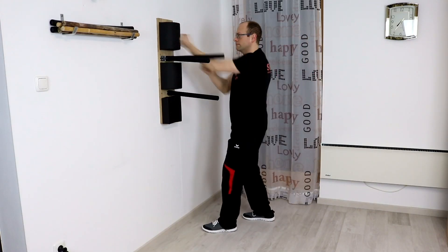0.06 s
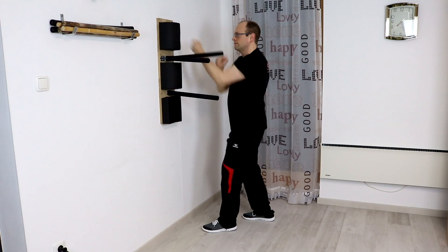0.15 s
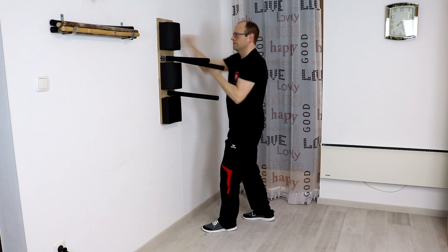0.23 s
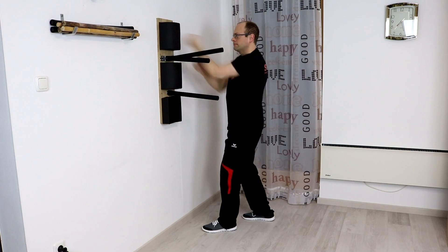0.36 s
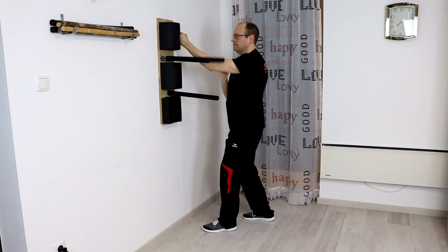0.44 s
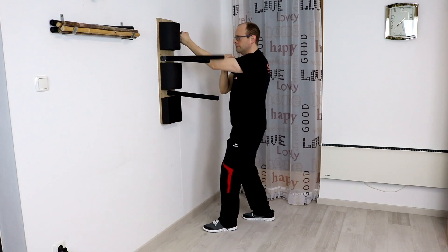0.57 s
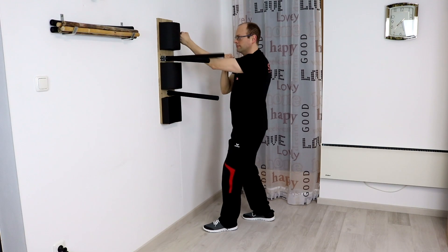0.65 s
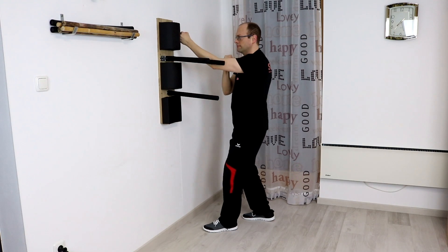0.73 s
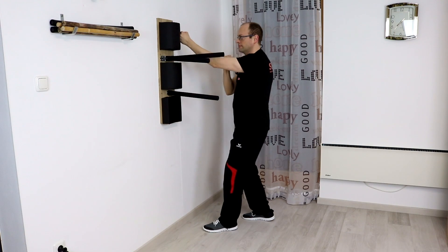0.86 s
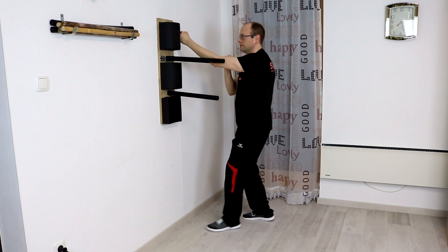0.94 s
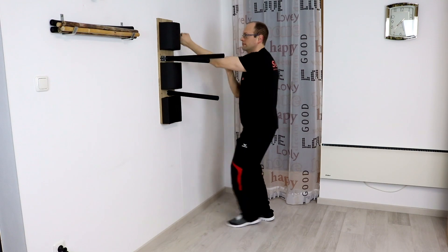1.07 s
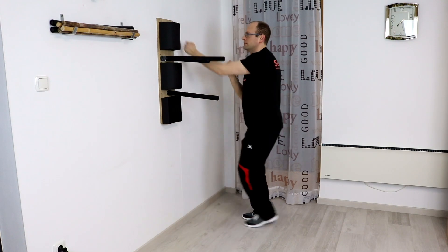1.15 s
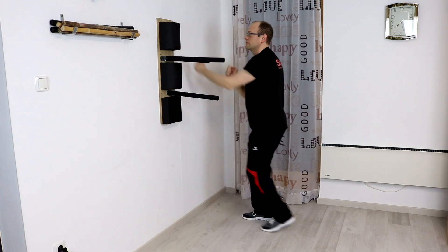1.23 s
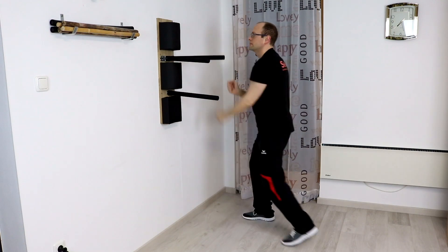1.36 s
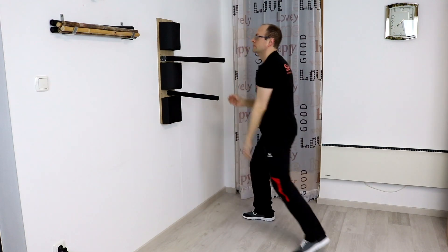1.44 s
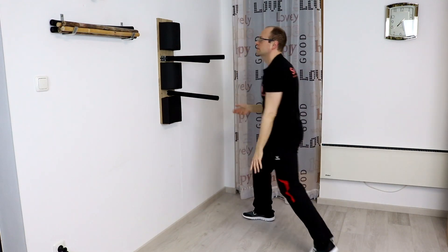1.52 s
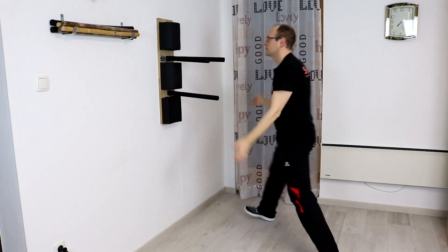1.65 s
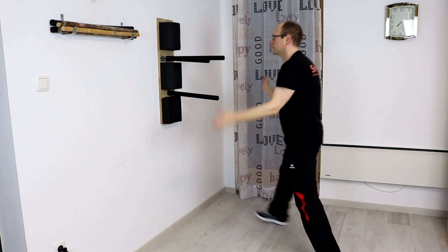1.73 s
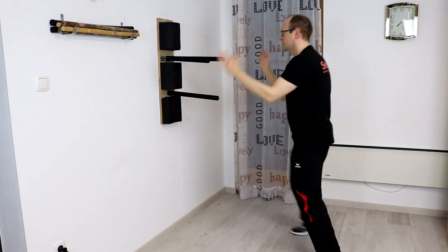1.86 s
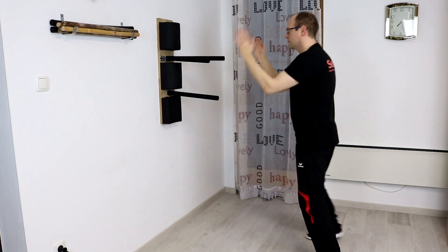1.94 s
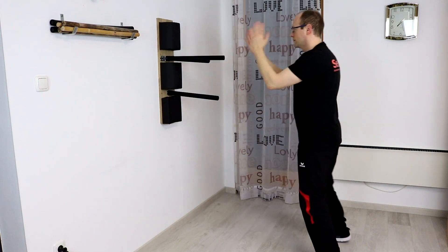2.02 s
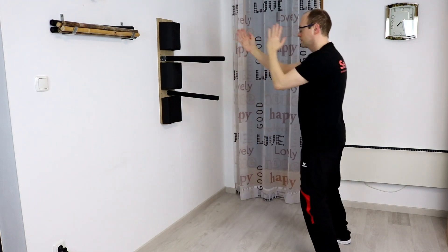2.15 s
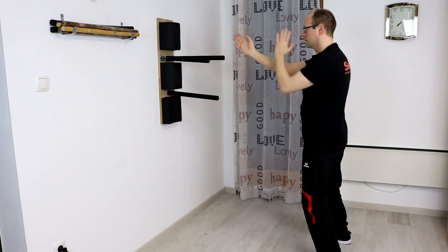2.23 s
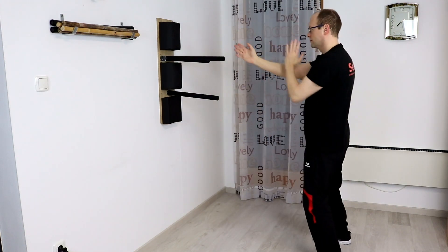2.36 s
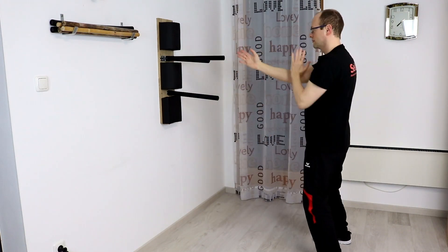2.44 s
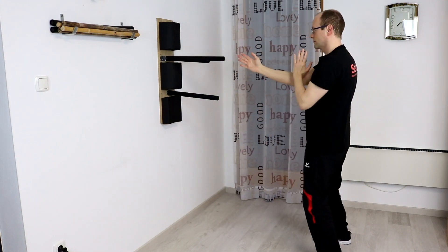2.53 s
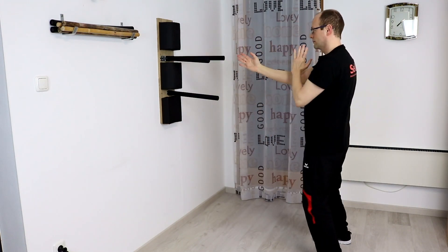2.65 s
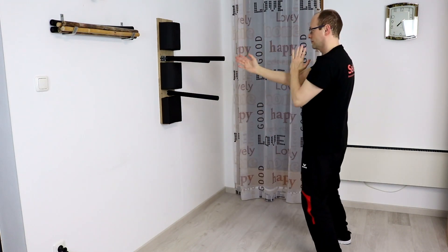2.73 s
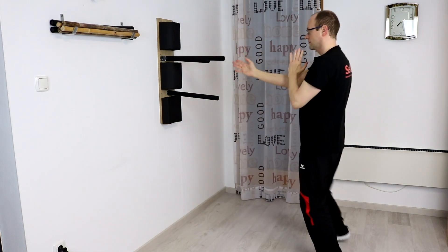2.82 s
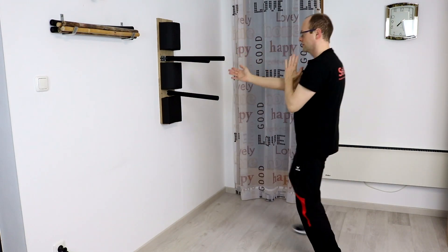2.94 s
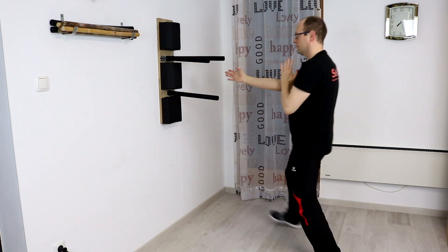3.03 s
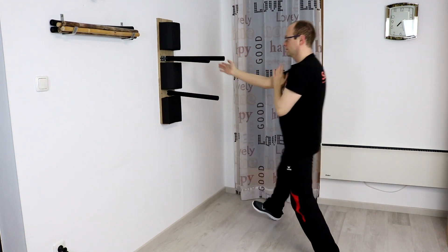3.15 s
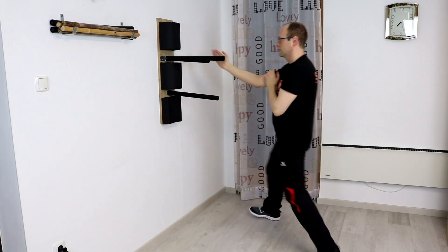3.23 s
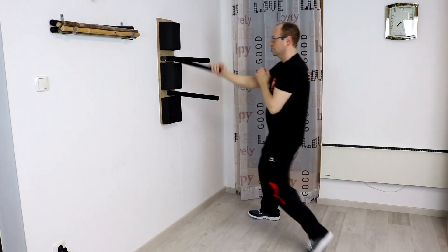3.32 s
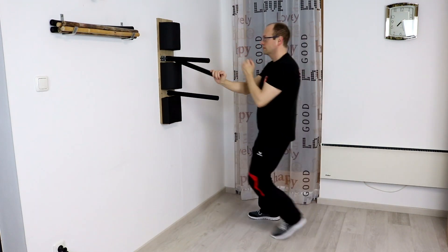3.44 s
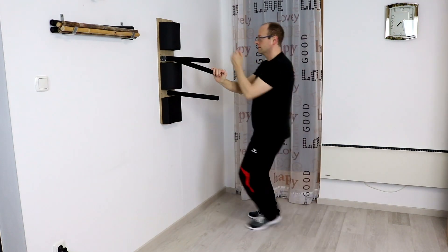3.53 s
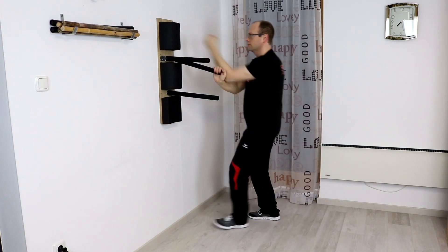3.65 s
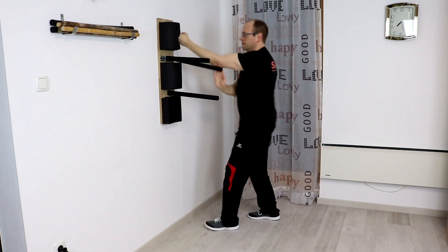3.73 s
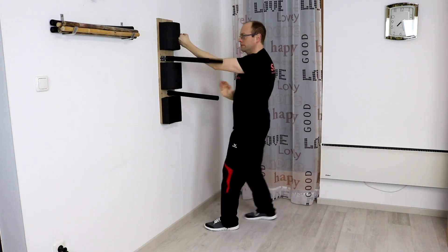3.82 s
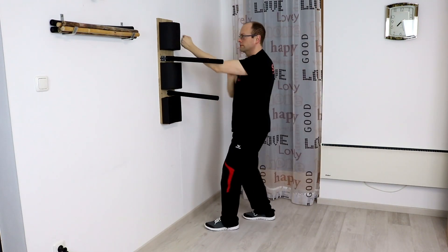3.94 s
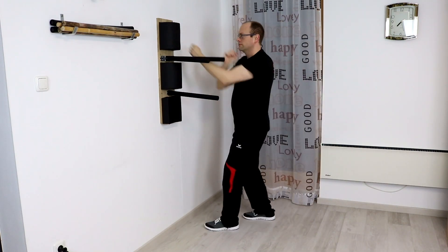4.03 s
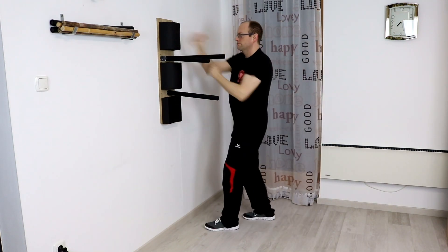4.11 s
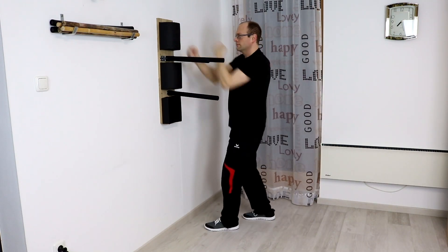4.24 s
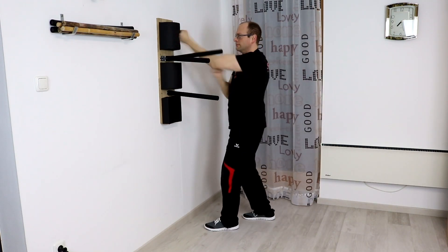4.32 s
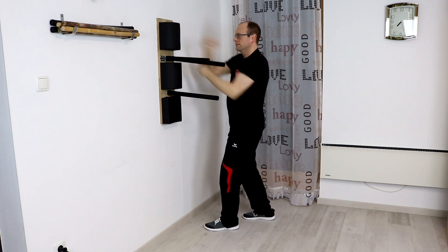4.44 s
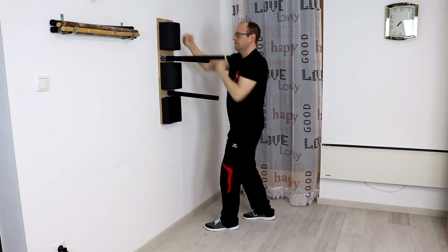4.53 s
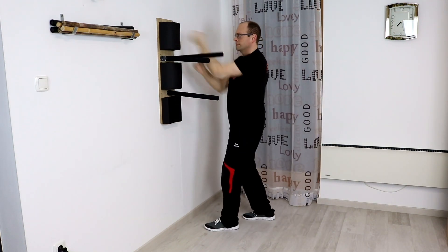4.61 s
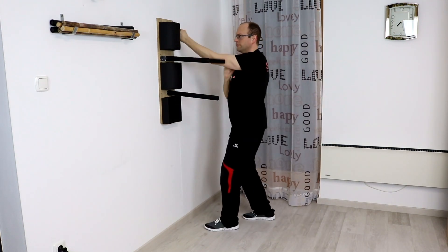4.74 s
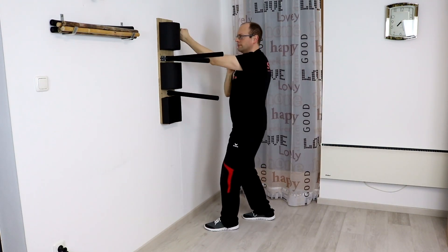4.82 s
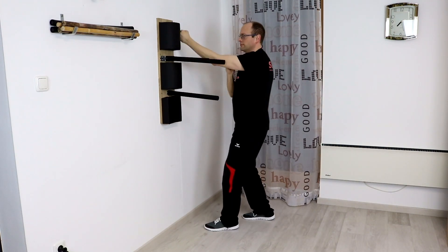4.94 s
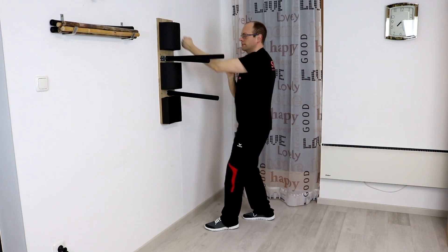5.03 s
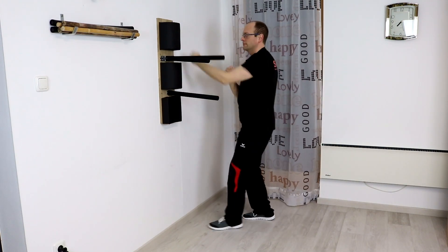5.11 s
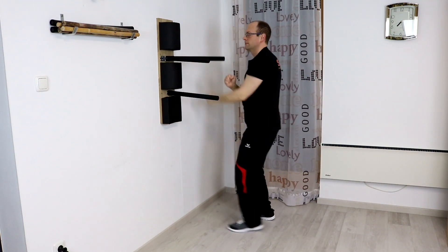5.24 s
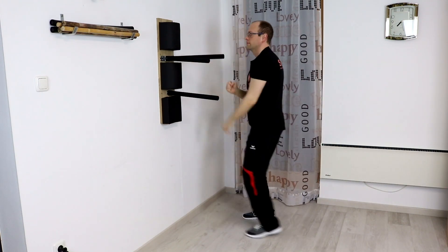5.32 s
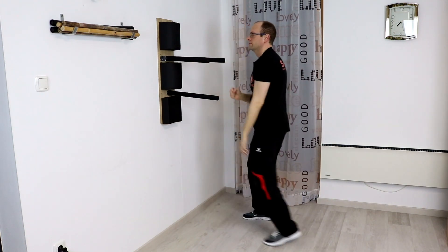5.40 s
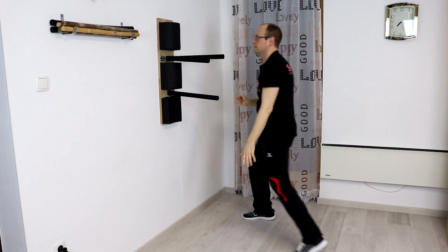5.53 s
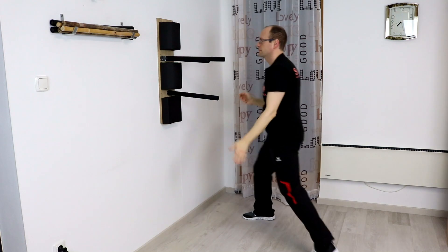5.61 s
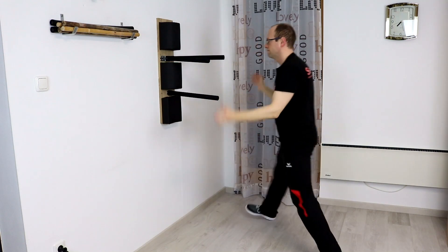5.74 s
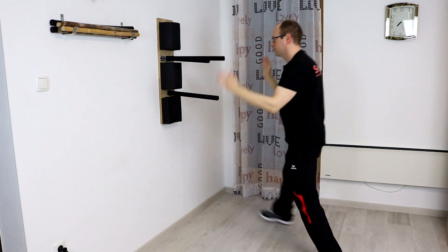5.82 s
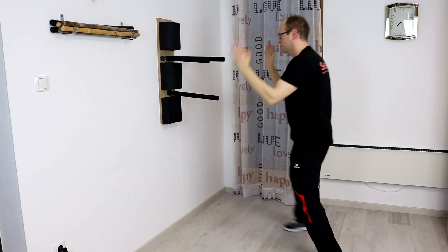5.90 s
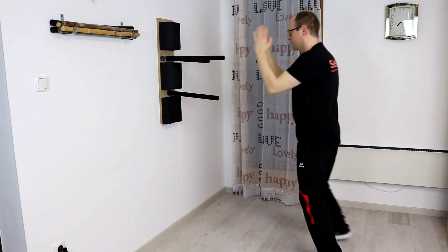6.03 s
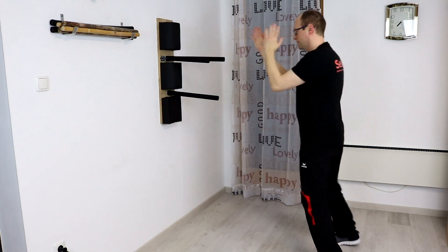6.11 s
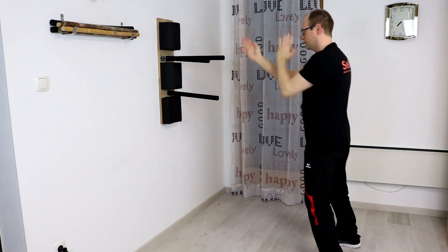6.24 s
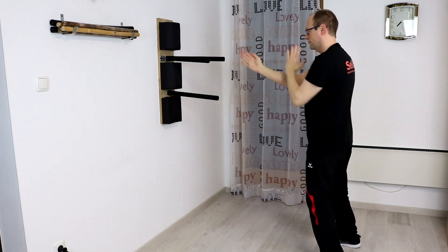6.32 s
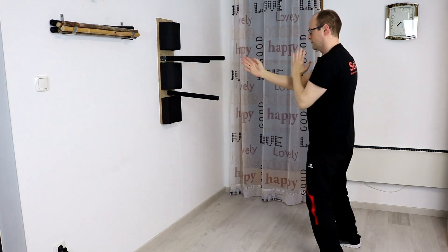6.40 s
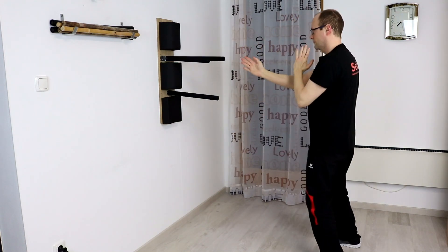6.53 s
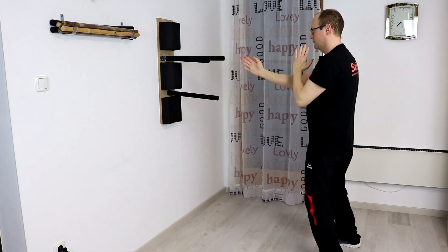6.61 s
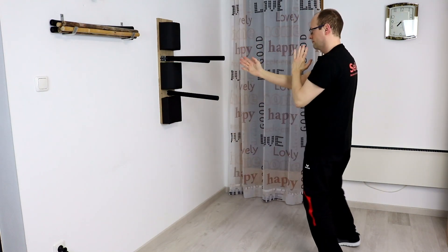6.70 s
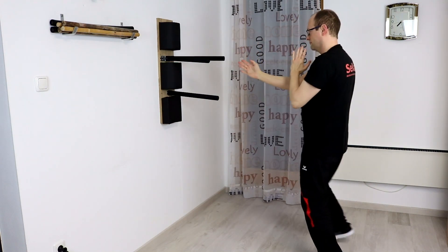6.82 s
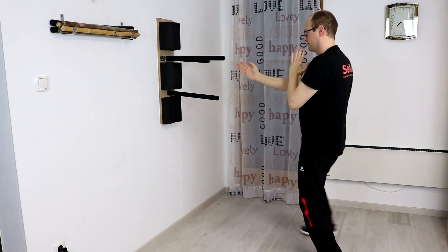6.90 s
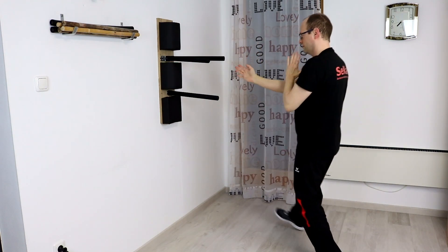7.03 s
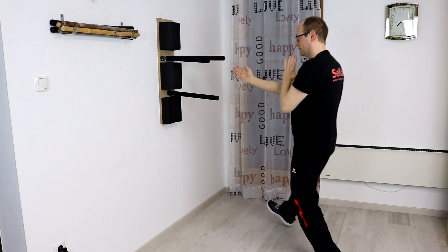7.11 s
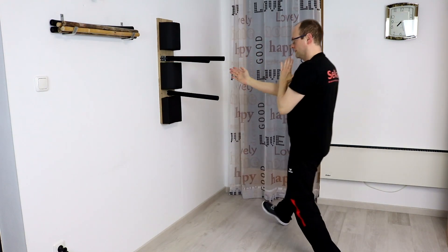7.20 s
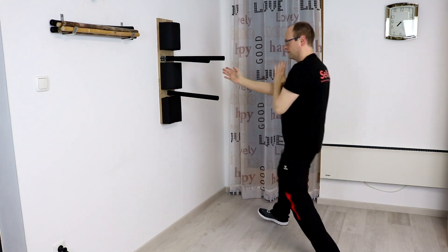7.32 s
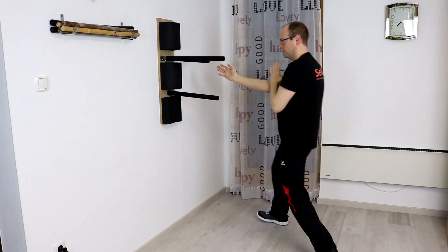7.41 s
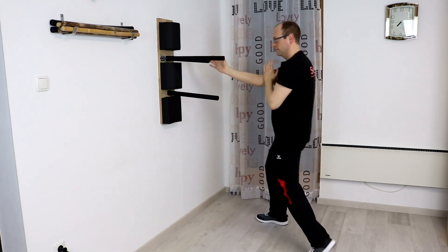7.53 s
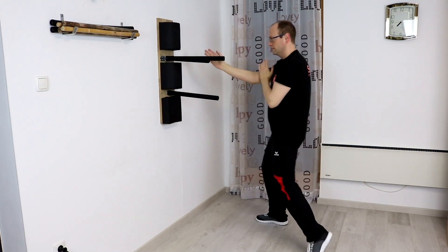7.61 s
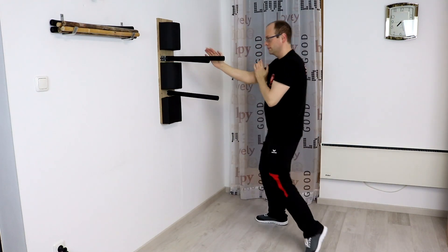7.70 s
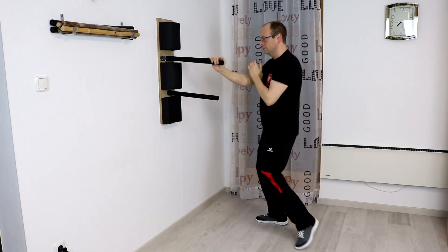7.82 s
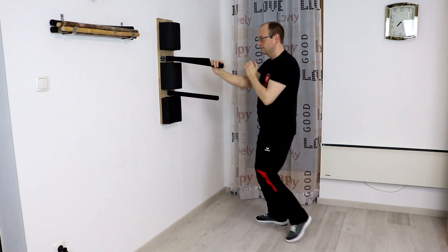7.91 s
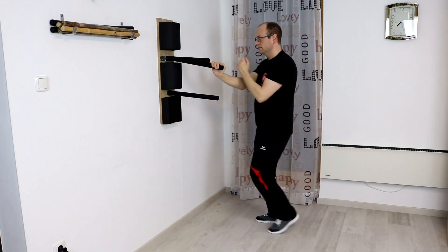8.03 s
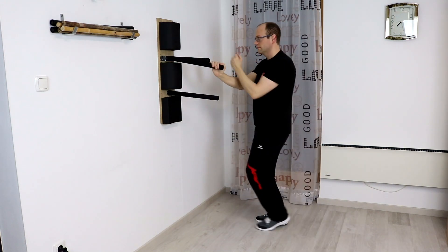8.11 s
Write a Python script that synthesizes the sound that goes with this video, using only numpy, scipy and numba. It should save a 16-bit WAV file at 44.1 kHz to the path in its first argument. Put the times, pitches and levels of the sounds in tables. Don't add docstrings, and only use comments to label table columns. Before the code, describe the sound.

Hard punches on a padded wooden board, sharp skin snaps with dull ringing thumps, separated by dragging soles, knocking steps and light palm slaps indoors.

```python
import sys
import numpy as np
from scipy import signal
from scipy.fft import rfft, irfft, next_fast_len
from scipy.io import wavfile
from scipy.ndimage import uniform_filter1d
from numba import njit

SR = 44100
rng = np.random.default_rng(int(sys.argv[2]) if len(sys.argv) > 2 else 0)


def pcm_store(signal):
    levels = np.round(np.clip(np.atleast_2d(signal), -1, 1) * 32767)
    wavfile.write(sys.argv[1], SR, levels.astype(np.int16).T)


def makeup_ratio(level_db):
    decades = np.asarray(level_db, float) / 20
    return 10 ** decades


N = 359856
LEAD = 4410


def unit(x):
    return x / np.sqrt(np.mean(x ** 2))


def colour(x, points):
    hz, db = np.transpose(points)
    size = next_fast_len(len(x))
    bins = np.maximum(np.arange(size // 2 + 1) * SR / size, 1)
    gain = makeup_ratio(np.interp(np.log(bins), np.log(hz), db))
    return irfft(rfft(x, size) * gain, size)[:len(x)]


def above(x, hz):
    return signal.sosfilt(signal.butter(4, hz, "high", fs=SR, output="sos"), x)


def resonate(x, peaks):
    return sum((-1) ** k * makeup_ratio(db) * signal.lfilter(*signal.iirpeak(hz, hz / width, SR), x)
               for k, (hz, width, db) in enumerate(peaks))


def fade(t, t60):
    return np.exp(-np.log(1000) * t / t60)


def wobble(size, rate):
    x = rng.standard_normal(size // 64 + 2)
    k = max(int(SR / 64 / rate), 1)
    x = unit(uniform_filter1d(uniform_filter1d(x, size=k), size=k))
    return np.interp(np.arange(size) / 64, np.arange(len(x)), x)


def add(track, sound, s, db):
    i = int(s * SR) + LEAD
    sound = sound[:len(track) - i]
    track[i:i + len(sound)] += sound * makeup_ratio(db) / np.max(np.abs(sound))


def push(t, contact_s):
    return np.sin(np.pi * np.minimum(t / contact_s, 1))


# (frequency [Hz], density [dB per Hz])
SKIN_CRACK = [(300, -22), (1200, -4), (2500, -1.5), (3400, -5), (4600, 0), (7500, 0.5), (10000, -7),
              (13000, -14.5), (16000, -20.5)]


def crack(gaps_s, spray_db):
    t = np.arange(2048) / SR
    snaps = makeup_ratio(spray_db) * rng.standard_normal(len(t)) * fade(t, 0.019)
    when, size = rng.random((2, 4))
    knuckles = (np.cumsum(gaps_s * (.5 + when)) * SR).astype(int)
    snaps[knuckles] += np.sign(size - .5) * (0.64 + 0.5 * size)
    snaps[0] = 1.1
    return colour(np.roll(snaps, 64), SKIN_CRACK)[56:]


def burst():
    return colour(np.arange(512) == 64, SKIN_CRACK)[32:]


# (frequency [Hz], width [Hz], level [dB])
FOAM_PAD = [(187, 72, -5.5), (328, 115, -0.5), (480, 120, 2.5), (787, 270, -4.5), (1300, 400, 0)]


def pad_thud(t):
    rebound = 0.75 * np.roll(push(t, .0013), int(.0055 * SR))
    crumple = 0.18 * rng.standard_normal(len(t)) * fade(t, 0.048)
    squash = push(t, 0.001) + rebound + crumple
    spot = [(hz * (1 + 0.071 * rng.standard_normal()), width, db + 3.1 * rng.standard_normal())
            for hz, width, db in FOAM_PAD]
    return resonate(squash, spot)


def pad_to_walls(t):
    return resonate(push(t, .00075), FOAM_PAD)


# (frequency [Hz], level [dB], decay t60 [s])
BOARD_MODES = [(125, -18, 0.85), (159.8, -15, 0.8), (189.7, 1, 1.02), (216.8, 0, 1.05), (259.9, -1, 0.84),
               (311.2, -4, .7), (344, 2, 1.0), (385, -7, .7), (422, -4, 0.6), (492.4, -1.5, 0.55),
               (560, -11, 0.46), (680, -14, .6), (835, -17, .6), (1003, -18, .55)]


def board_ring(size):
    t = 8 * np.arange(size) / SR
    ring = np.zeros(size)
    for hz, db, t60 in BOARD_MODES:
        beating = makeup_ratio(db + 3.8 * wobble(size, rate=200)) * fade(t, t60)
        ring += beating * np.sin(2 * np.pi * hz * t + 0.85 * wobble(size, rate=160))
    return signal.resample_poly(ring * (1 - fade(t, .32)), 8, 1)


# (time [s], crack [dB], thud [dB], share to the walls [dB], board ring [dB])
FIST_BLOWS = [
    (0.0965, -12, -14, 0, 0.5),
    (0.271, -4, -7, 0.5, 0),
    (0.4015, -6, -12, 0.5, 0),
    (3.7284, -3.5, -9.5, 3, 2),
    (4.1593, 0, -9, 1.5, 0),
    (4.3271, -5, -8, -1, 2),
    (4.508, -2.5, -6.5, 0, -0.5),
    (4.663, -8, -11, 1, 0),
]
BLOW_BEFORE = (-0.05, -3.5, -5.5, -1, -0.5)


def punches():
    near, walls, t = np.zeros(N + LEAD), np.zeros(N + LEAD), np.arange(4500) / SR
    for s, crack_db, thud_db, wall_db, ring_db in [BLOW_BEFORE, *FIST_BLOWS]:
        add(near, crack(gaps_s=.0008, spray_db=-12), s, crack_db + 4.5)
        add(walls, burst(), s, crack_db + wall_db + 8.0)
        add(near, pad_thud(t), s + 0.001205, thud_db + 6.5)
        add(walls, pad_to_walls(t), s, thud_db + wall_db + 1.5)
        add(near, board_ring(len(t)), s + .002, thud_db + ring_db - 3.2)
    return np.array([near, walls])


# (time [s], crack [dB], body [dB], body pitch [Hz], share to the walls [dB])
PALM_SLAPS = [
    (1.6679, -18.5, -23.5, 2400, 5),
    (3.2988, -7, -23, 1080, 2),
    (5.7233, -14, -22.5, 1850, -10),
    (5.7485, -21, -18, 2600, -9),
]


def slaps():
    near, walls, t = np.zeros(N + LEAD), np.zeros(N + LEAD), np.arange(2048) / SR
    for s, crack_db, body_db, hz, wall_db in PALM_SLAPS:
        add(near, crack(gaps_s=.0008, spray_db=-14), s, crack_db + 4.5)
        add(walls, burst(), s, crack_db + wall_db + 6.5)
        pop = resonate(push(t, 0.00019), [(hz, 0.64 * hz, 0)])
        for track in (near, walls):
            add(track, pop, s, body_db + 5.5)
    return np.array([near, walls])


# (time [s], knock [dB], knock pitch [Hz], upper knock [dB], deep thump [dB])
FOOTFALLS = [
    (1.796, -12.5, 1000, -19.5, -51),
    (2.785, -47, 845, -57, -71),
    (3.191, -18, 592, -39, -46.5),
    (3.472, -29, 640, -26, -58),
    (5.956, -21, 595, -37, -58),
    (7.231, -30, 537, -45, -52),
    (7.51, -44, 554, -52.5, -65),
]


def steps():
    near, walls, t = np.zeros(N + LEAD), np.zeros(N + LEAD), np.arange(8192) / SR
    swell = 1 - fade(t, 0.011)
    for s, knock_db, hz, upper_db, thump_db in FOOTFALLS:
        knock = swell * fade(t, 0.021) * np.sin(2 * np.pi * hz * t)
        add(near, knock, s - .0015, knock_db + 1.0)
        plank = resonate(push(t, 0.00057), [(hz, .9 * hz, 0), (0.4 * hz, 0.38 * hz, -3)])
        add(walls, above(plank, hz=230), s, knock_db + 1)
        upper = swell * fade(t, .02) * np.sin(2 * np.pi * min(2.3 * hz, 1950) * t)
        thump = swell * fade(t, .15) * np.sin(2 * np.pi * 105 * t)
        for track in (near, walls):
            add(track, upper, s, upper_db)
            add(track, thump, s, thump_db + 0.2)
    return np.array([near, walls])


def stroke(t, s, db, climb_s, hold_s, release=170):
    late = t - s
    climb = 20 * np.minimum(late, 0) / max(climb_s, .005)
    sag = 42 * np.clip(late, 0, hold_s)
    let_go = release * np.array([1, 1, 1, 1.6])[:, None] * np.maximum(late - hold_s, 0)
    return db + climb - sag - let_go


def layer_power(level_db, mix_db):
    return makeup_ratio(level_db + np.array([0, *mix_db])[:, None]) ** 2


# (time of full
# grip [s], hiss [dB], time to climb 20 dB [s], hold [s], weight on the boards [dB])
SOLE_DRAGS = [(.945, -39, .035, .06, -12), (1.06, -27.5, .13, .2, -5), (1.335, -33.5, .15, .1, 4),
              (1.806, -27, .01, .03, 2), (1.864, -21.5, .07, .18, -7), (3.573, -43, .1, .02, 4),
              (3.86, -31, .1, .03, -10), (5.132, -37, .08, .05, -10), (5.18, -37.5, .1, .07, -3),
              (5.28, -34, .05, .04, 5), (5.346, -31, .13, .1, 4), (5.43, -36, .06, .13, 6),
              (5.968, -33, .012, .05, 2), (6.04, -33, .1, .05, 3), (6.135, -29, .15, .005, -1.5),
              (2.786, -62, .03, .05, 6), (2.902, -46, .08, .02, -2.5), (3.0, -53, .2, .1, -3),
                 (3.15, -53, .3, .04, -4), (3.205, -50, .012, .02, 10), (6.72, -59, .05, .07, 0),
                 (7.08, -56, .3, .13, 0), (7.245, -55, .012, .04, 9), (7.4, -48, .3, .07, -5),
                 (7.58, -49, .12, .1, -8), (7.727, -45.5, .12, .1, -12), (7.957, -49, .3, .03, 5)]


def drags(slow):
    power, load = np.zeros((4, len(slow))), 0
    for s, db, climb_s, hold_s, weight_db in SOLE_DRAGS:
        rubber_db, thin_db = -.5 + .65 * weight_db, -7
        sole = layer_power(stroke(slow, s, db, climb_s, hold_s), (weight_db, rubber_db, thin_db))
        grip_hz = 1450 * 2 ** (-.035 * weight_db)
        power, load = power + sole, load + grip_hz * sole[2]
    return power, load


# (time of full grip [s], hiss [dB], time to climb 20 dB [s], hold [s], grip pitch [Hz])
EDGE_SKIDS = [
    (1.678, -36, .01, .02, 1800),
    (3.485, -33.5, .015, .035, 1650),
    (5.751, -33, .02, .005, 2000),
    (8.0, -43, .05, .1, 1700),
]
# (level [dB], level [dB], level [dB])
SKID_LAYERS = (-6, 4, -7)


def skids(slow):
    power, load = 0, 0
    for s, db, climb_s, hold_s, grip_hz in EDGE_SKIDS:
        edge = layer_power(stroke(slow, s, db, climb_s, hold_s), SKID_LAYERS)
        power, load = power + edge, load + grip_hz * edge[2]
    return power, load


# (time of full speed [s], hiss [dB], time to climb 20 dB [s], hold [s])
CLOTH_SWISHES = [(.075, -36, .15, .01), (.256, -50, .1, .01), (1.2, -40, .2, .06), (1.34, -37, .12, .07),
                 (1.5, -37, .1, .09), (3.285, -40, .12, .01), (3.48, -40, .01, .05),
                 (3.715, -46.5, .1, .01), (3.87, -37, .06, .01), (4.022, -51, .03, .005),
                 (4.125, -52, .02, .03), (4.25, -33, .15, .02), (5.04, -60, .2, .01), (5.46, -39, .15, .12),
                 (5.63, -35.5, .25, .035), (5.964, -35, .008, .11), (6.846, -47, .08, .005),
                 (7.74, -50, .1, .05), (7.85, -47, .3, .05), (7.95, -45, .08, .04), (8.02, -40, .15, .11)]
# (level [dB], level [dB], level [dB])
SWISH_LAYERS = (-7, -3.5, 2.5)


def swishes(slow):
    return sum(layer_power(stroke(slow, s, db, climb_s, hold_s), SWISH_LAYERS)
               for s, db, climb_s, hold_s in CLOTH_SWISHES)


# (level [dB], level [dB], level [dB])
SHAKE_LAYERS = (-8, -2, -8)


def shirt_shakes(slow):
    power = 0
    for s, crack_db, *_ in [BLOW_BEFORE, *FIST_BLOWS, PALM_SLAPS[1]]:
        shake = stroke(slow, s + .035, crack_db - 30, climb_s=.02, hold_s=.04, release=118)
        power = power + layer_power(shake, SHAKE_LAYERS)
    return power


def grit(size):
    return rng.standard_normal(size) * makeup_ratio(2.45 * rng.exponential(size=size))


def clumps(size, peaks, stutter_db, rate, favour):
    grains, out = grit(size), 0
    for hz, width, db in peaks:
        catch = favour(hz) * makeup_ratio(db + stutter_db * wobble(size, rate))
        narrow = resonate(grains, [(hz, width, 0)])
        out = out + catch * resonate(narrow, [(hz, 2 * width, 0)])
    return out


# (frequency [Hz], width [Hz], level [dB])
LAMINATE = [(350, 120, -6), (481, 134, -0.5), (608.4, 146, -0.5), (800, 192, -5.5)]
# (frequency [Hz], width [Hz], level [dB])
SOLE_RUBBER = [(1000, 250, -0.5), (1250, 276, 0.5), (1549, 360, -0.5), (1901, 390, 0), (2333, 430, 0)]
# (frequency [Hz], density [dB per Hz])
GRIT_HISS = [(1000, -44), (2100, -8.5), (3000, -1), (6000, -2.5), (7800, -10), (12000, -36)]
# (frequency [Hz], density [dB per Hz])
THIN_HISS = [(3500, -49), (6200, -9), (8000, 0), (10500, -5), (13000, -11.5), (16000, -19.5)]


def slides():
    t = (np.arange(N + LEAD) - LEAD) / SR
    slow = t[::64]
    drag_power, drag_load = drags(slow)
    skid_power, skid_load = skids(slow)
    soles = drag_power + skid_power
    grip_hz = np.interp(t, slow, (drag_load + skid_load) / soles[2])
    power = soles + swishes(slow) + shirt_shakes(slow)
    hiss, thin = (makeup_ratio(1.2 * wobble(len(t), rate=56)) * colour(grit(len(t)), body)
                  for body in (GRIT_HISS, THIN_HISS))
    boards = clumps(len(t), LAMINATE, 4.04, rate=30, favour=lambda hz: 1)
    rubber = clumps(len(t), SOLE_RUBBER, 3.0, rate=40.6,
                    favour=lambda hz: 0.41 + np.exp(-(np.log(hz / grip_hz) / 0.31) ** 2))
    mix = sum(np.interp(t, slow, np.sqrt(p)) * unit(layer)
              for p, layer in zip(power, (hiss, boards, rubber, thin)))
    return above(mix, hz=230)


# (delay [s], level [dB])
FIRST_ECHOES = [(.0072, -6.5), (.0125, -12.5), (.019, -18.5), (.031, -16.5)]
# (frequency [Hz], decay t60 [s], level [dB])
ROOM_TAIL = [(100, .9, -4), (200, 1.0, -1.5), (395, 0.74, -3), (800, 0.62, -2.5), (1600, 0.59, -2),
             (3250, 0.59, -2), (6400, 0.51, -6.5), (12800, .4, -8.5)]


def room(near, walls, tail_db):
    t = np.arange(int(1.5 * SR)) / SR
    tail = np.zeros(len(t))
    for hz, t60, db in ROOM_TAIL:
        edges = [hz / np.sqrt(2), min(hz * np.sqrt(2), .45 * SR)]
        octave = signal.butter(2, edges, "band", fs=SR, output="sos")
        band = signal.sosfilt(octave, rng.standard_normal(len(t)))
        tail += makeup_ratio(db) * band * fade(t, t60) / np.sqrt(t60 * SR / 14)
    tail *= 1 - fade(t, 0.032)
    echoes = sum(makeup_ratio(db) * np.roll(near, int(s * SR)) for s, db in FIRST_ECHOES)
    return near + echoes + makeup_ratio(tail_db) * signal.fftconvolve(walls, tail)[:len(near)]


# (frequency [Hz], density [dB per Hz])
STILL_AIR = [(15, -36), (25, -5), (92, -5), (134, -9.5), (223, -0.5), (285, -3), (754, -10.5), (1260, -10),
             (1400, -5.5), (1650, -10.5), (9070, -17.5), (14800, -18), (16000, -17.5)]


def room_air():
    return makeup_ratio(-55.8) * unit(colour(rng.standard_normal(N), STILL_AIR))


def scene():
    scrape = slides()
    near, walls = punches() + slaps() + steps()
    heard = room(near, walls + makeup_ratio(-9) * scrape, tail_db=3.5) + makeup_ratio(-0.5) * scrape
    return np.tile(heard[LEAD:] + room_air(), (2, 1))


@njit
def follow(x, attack, release):
    out, e = np.empty(len(x)), 1e-6
    for i in range(len(x)):
        e += (abs(x[i]) - e) * (attack if abs(x[i]) > e else release)
        out[i] = e
    return out


# (frequency [Hz], level [dB])
SIDE_TRACE = [(60, -12), (110, -21), (200, -25), (380, -28), (700, -24), (1290, -18), (2380, -13),
              (4400, -3), (8120, -3), (15000, 0)]


def channel_trace(mono):
    trace = makeup_ratio(-17.5) * colour(mono * wobble(N, rate=90), SIDE_TRACE)
    return np.array([trace, -trace])


def band_limit(x):
    return signal.sosfilt(signal.butter(12, 16500, fs=SR, output="sos"), x)


def record(dry):
    knee_db, ratio, attack_s, release_s, late_s = -12.5, 5.0, 0.03, 0.01, 0.05
    bass_hz, top_hz = 59.5, 15900
    dry = signal.sosfilt(signal.butter(2, bass_hz, "high", fs=SR, output="sos"), dry)
    level = follow(dry[0], 1 / (attack_s * SR), 1 / (release_s * SR))
    level = np.roll(level, int(late_s * SR))
    held = dry * np.minimum(makeup_ratio(knee_db) / level, 1) ** (1 - 1 / ratio)
    clipped = np.clip(held, -1, 1)
    cut = signal.sosfilt(signal.ellip(8, .2, 70, top_hz, fs=SR, output="sos"), clipped)
    return band_limit(cut + channel_trace(cut[0]))


dry = scene()
out = record(dry)
pcm_store(out)
```